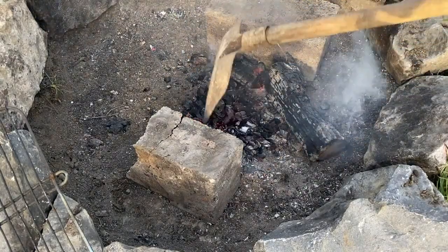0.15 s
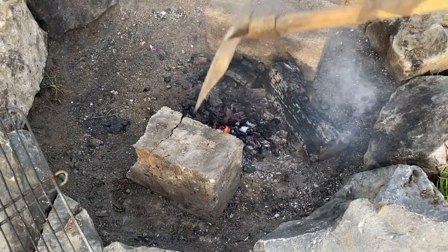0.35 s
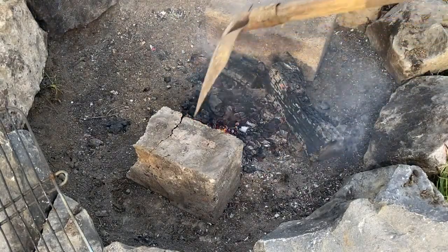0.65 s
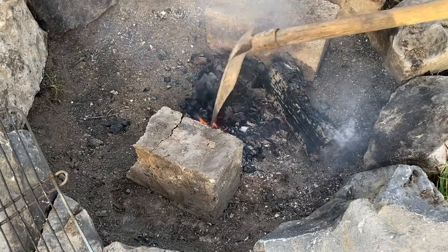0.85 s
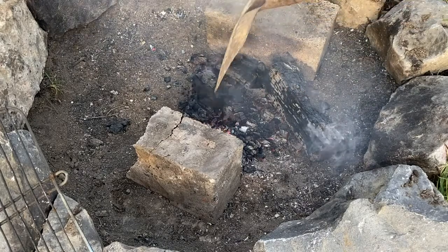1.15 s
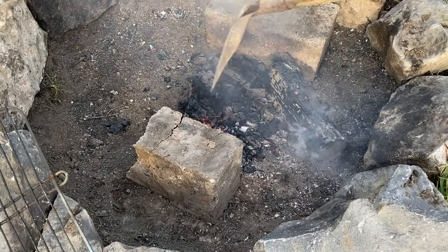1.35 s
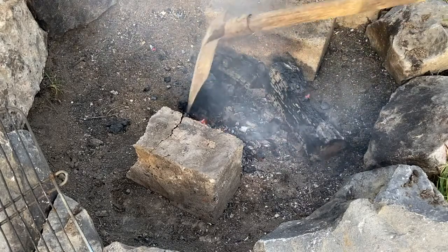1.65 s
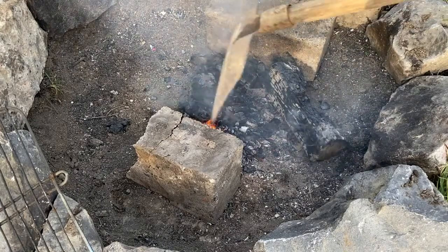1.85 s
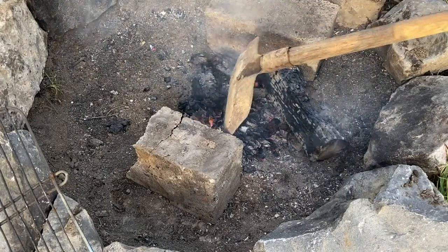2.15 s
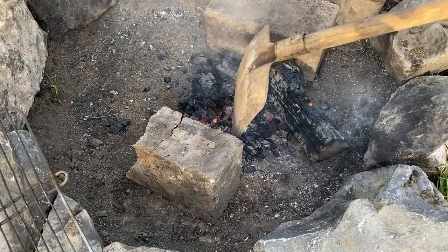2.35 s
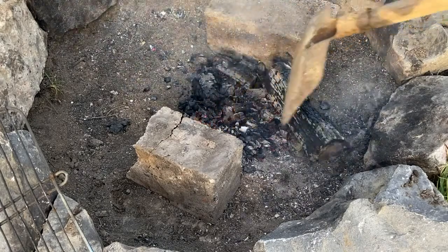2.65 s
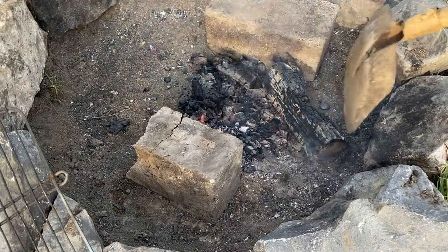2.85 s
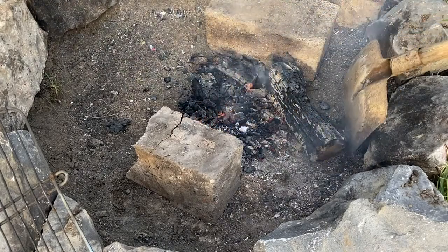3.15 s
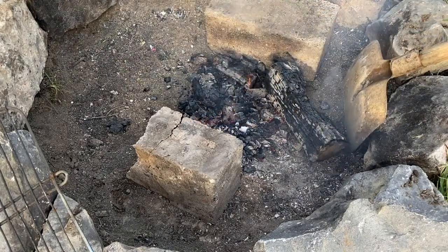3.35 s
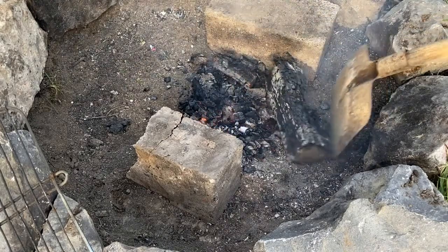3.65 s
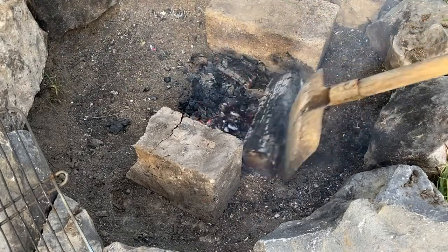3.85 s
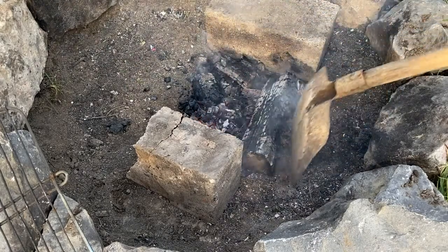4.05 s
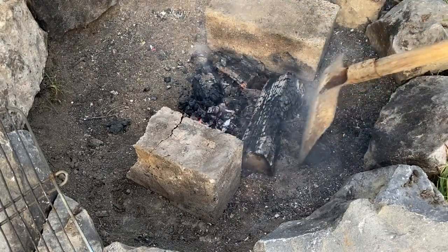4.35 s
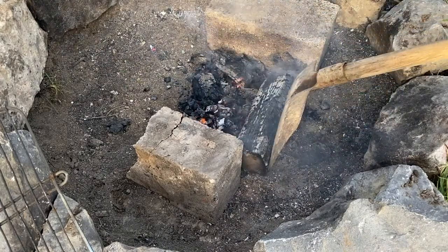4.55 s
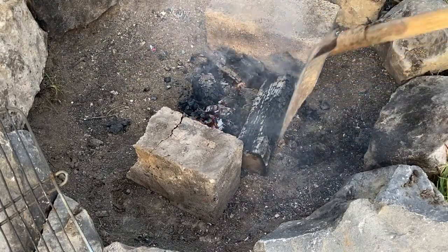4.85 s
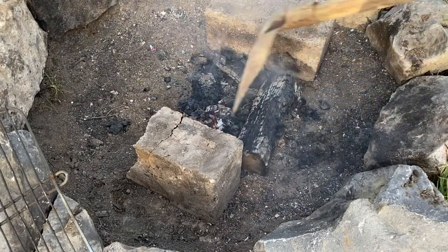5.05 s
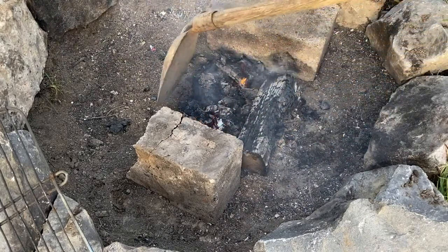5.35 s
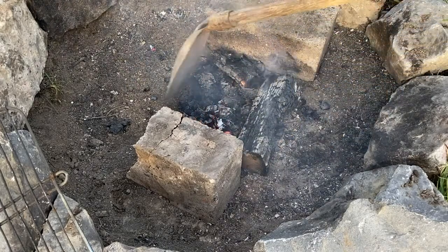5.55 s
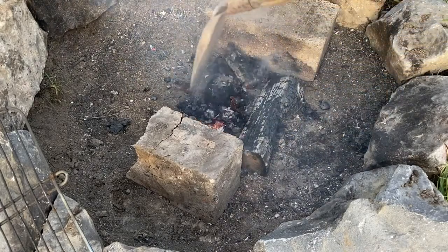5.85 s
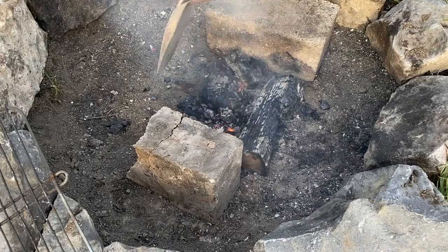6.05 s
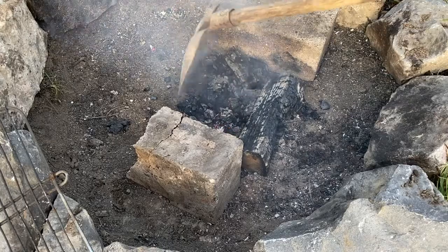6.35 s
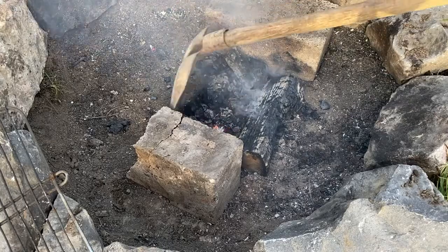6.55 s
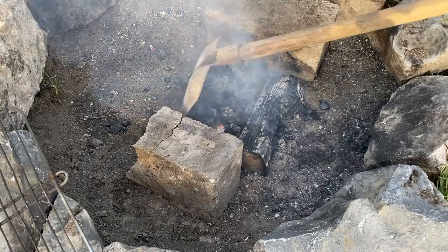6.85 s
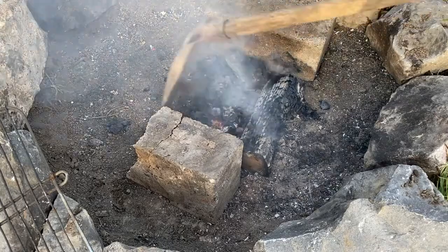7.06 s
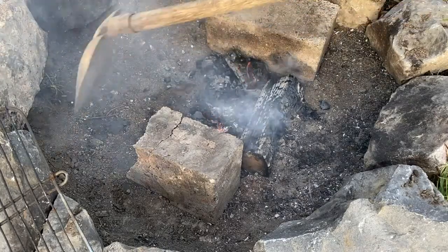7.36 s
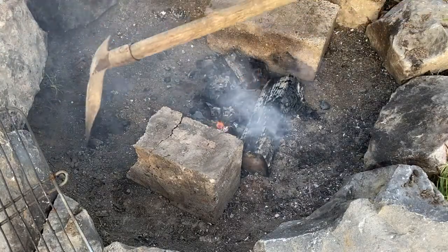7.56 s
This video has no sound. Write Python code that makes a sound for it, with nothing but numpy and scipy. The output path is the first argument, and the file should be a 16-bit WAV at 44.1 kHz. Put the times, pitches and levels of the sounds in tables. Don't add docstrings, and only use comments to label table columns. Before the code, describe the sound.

Outdoors, close phone pickup of a steel shovel in a stone fire pit. A soft thud and crunch open at 0 s, a sharp jab with brittle charcoal crunch lands at 0.34, a small metallic knock at 0.58, and a grating crunch at 0.78. After a lull of tiny ember ticks, jabs hit at 1.45-1.5 and a fuller thud with a crumbling scrape around 2.0, beside a sharp pop. It is mostly quiet until light grit at 3.1, then a log is nudged with crunches, clacks and thin ringing at 3.7, 4.2 and 4.4. Another hush of ticks precedes busy scraping at 5.35-5.7 with a thud and short metal squeal. The strongest blows come at 6.15, clanging and ringing, and 6.53, a heavy short thud, followed by coarse drags to 7.0. A final scrape and clink falls near 7.65. Low airy hum and a faint, intermittent far motor continue underneath.

```python
import sys
import numpy as np
from scipy import signal
from scipy.io import wavfile
from scipy.ndimage import uniform_filter1d

SR = 44100
rng = np.random.default_rng(int(sys.argv[2]) if len(sys.argv) > 2 else 0)


def voltage_ratio(level):
    return 10 ** (np.asarray(level, float) / 20)


def unload_audio(sound):
    columns = np.transpose(np.atleast_2d(sound))
    steps = np.round(np.clip(columns, -1, 1) * 32767)
    wavfile.write(sys.argv[1], SR, steps.astype(np.int16))


N = 340452


def evened(x):
    return x / np.sqrt(np.mean(x ** 2) + 1e-20)


def read(points, hz):
    f, value = np.transpose(points)
    return np.interp(np.log(hz + 1), np.log(f + 1), value)


def add(mix, start_s, sound):
    part = mix[max(round(start_s * SR), 0):][:len(sound)]
    part += sound[:len(part)]


def decay(t, t60_s, rise_s):
    rise = (1 - np.exp(-t / max(rise_s, 1e-4))) ** 2
    shape = rise * voltage_ratio(-60 * t / max(t60_s, .004))
    return shape / shape.max()


def coloured(x, spectrum, patchy_db, size, frames, bins):
    hz, _, z = signal.stft(x, SR, nperseg=size, noverlap=size * 3 // 4)
    patches = rng.standard_normal(z.shape)
    patches = uniform_filter1d(patches, size=frames, axis=1)
    patches = evened(uniform_filter1d(patches, size=bins, axis=0))
    z = z * voltage_ratio(read(spectrum, hz)[:, None] + patchy_db * patches)
    _, y = signal.istft(z, SR, nperseg=size, noverlap=size * 3 // 4)
    return evened(y[:N])


def blows(table, spread, rise_s, side_gain):
    out, t = np.zeros(N), np.arange(SR * 2 // 5) / SR
    chance = rng.random((len(table), 2, 4))
    for (start_s, db, hz, t60_s), (detune, phase) in zip(table, chance):
        side_hz = hz * np.exp(spread * (2 * detune - 1))
        side = np.sin(2 * np.pi * (np.outer(t, side_hz) + phase)).sum(axis=1)
        tone = np.sin(2 * np.pi * hz * t) + side_gain * side
        add(out, start_s - .001, voltage_ratio(db) * tone * decay(t, t60_s, rise_s))
    return out


def air():
    # frequency in Hz, level in dB per Hz.
    air_spectrum = [(12, -54), (20, -44), (53, -12.5), (124, -2.5), (217, -8), (250, -7), (288, -14.5),
                    (414, -11.5), (463, -14.5), (548, -17.5), (6130, -32.5), (15000, -33.5), (16400, -31)]
    # time in seconds, level in dB.
    drone_level = [
        (0, -53),
        (.5, -105),
        (3.6, -67),
        (4.2, -64),
        (5.4, -74),
        (5.9, -112),
        (7.72, -58),
    ]
    drone_hz = 70
    noise = rng.standard_normal(N)
    hum = voltage_ratio(-62) * coloured(noise, air_spectrum, patchy_db=1.8, size=2048, frames=8, bins=10)
    t = np.arange(N) / SR
    waver = evened(uniform_filter1d(rng.standard_normal(N), size=3000))
    tone = np.sin(2 * np.pi * np.cumsum(drone_hz * (1 + 0.125 * waver)) / SR)
    return hum + voltage_ratio(np.interp(t, *np.transpose(drone_level))) * tone


def fire():
    # start in seconds, peak in dB, frequency in Hz, T60 in seconds.
    ember_pops = [(0.0868, -39, 8400, 0.035), (0.8998, -43, 3620, 0.017), (1.2085, -40, 10600, 0.02),
                  (1.6198, -41, 6450, 0.0096), (1.664, -47, 8610, 0.019), (1.703, -41.5, 11000, 0.016),
                  (1.825, -52.5, 4970, 0.027), (1.8864, -52.5, 9070, 0.032), (2.072, -33, 5770, 0.02),
                  (2.169, -49.5, 6740, 0.014), (2.587, -39, 9490, 0.02), (2.6693, -47.5, 10600, 0.019),
                  (2.763, -52, 8500, 0.025), (3.205, -49, 9000, 0.033), (3.3988, -48, 10500, 0.01),
                  (5.032, -50, 9794, 0.023), (5.2426, -46, 9300, 0.012), (5.846, -45, 9000, 0.035),
                  (5.9469, -51, 9930, 0.015), (7.009, -43.5, 7760, 0.017), (7.385, -43, 4450, 0.0067)]
    # start in seconds, peak in dB, frequency in Hz, T60
    # in seconds.
    faint_ticks = [
        (1.0217, -58, 4230, 0.012),
        (1.0621, -56, 11400, 0.012),
        (1.1299, -58, 12100, 0.012),
                   (4.7745, -59, 10900, 0.012),
        (4.8194, -60, 12200, 0.012),
        (4.8743, -52, 9810, 0.012),
        (4.8928, -57, 12000, 0.012),
        (4.9382, -58, 7020, 0.012),
                   (7.052, -58, 9000, .012),
        (7.0717, -55, 12000, .012),
    ]
    rise_s = .00015
    out, t = np.zeros(N), np.arange(2000) / SR
    pops = ember_pops + faint_ticks
    noise = rng.standard_normal((len(pops), len(t)))
    for (start_s, db, hz, t60_s), puff in zip(pops, noise):
        band = signal.butter(1, [hz * 0.5, min(hz * 1.78, 18000)], "bandpass", fs=SR)
        shape = decay(t, t60_s / 5, rise_s) + 1.05 * decay(t, t60_s, rise_s)
        add(out, start_s, voltage_ratio(db - 10.0) * evened(signal.lfilter(*band, puff)) * shape)
    return out


def pit(x):
    taps = np.zeros(SR // 4)
    slots = np.arange(120, len(taps) - 22, 22)
    at = slots + rng.integers(0, 22, len(slots))
    taps[at] = rng.choice([-1., 1.], len(at)) * voltage_ratio(-60 * at / SR / 0.093)
    taps = signal.lfilter(*signal.butter(1, 6000, fs=SR), taps)
    return signal.fftconvolve(x, taps / np.linalg.norm(taps))[:N]


def jolts():
    # start in seconds, peak in dB, frequency in Hz, T60 in seconds.
    low_blows = [(0.0, -49, 85.3, 0.26), (0.34, -48, 96, .2), (0.78, -58, 102, .2), (3.4, -62.5, 85, .5),
                 (5.46, -58, 50.4, 0.23), (6.15, -62, 60, .3), (6.75, -65, 90, .2),
                 (7.66, -58.5, 70, 0.22), (3.735, -46, 190, .1), (6.155, -37, 190, .08),
                 (6.527, -37, 195, .12), (6.63, -51, 200, .15)]
    return blows(low_blows, spread=0.3, rise_s=0.0059, side_gain=0.37)


def thuds():
    # start in seconds, peak in dB, frequency in Hz, T60 in seconds, hollow note in dB.
    dull_blows = [(0.002, -52.5, 240, 0.063, -55), (0.087, -37.5, 277, 0.045, -43),
                  (0.273, -44, 271, 0.18, -60), (0.337, -26, 258.6, 0.063, -46),
                  (0.375, -42, 260, 0.18, -63), (0.582, -32.5, 272, 0.031, -39),
                  (0.774, -42.5, 273.6, 0.2, -46), (1.449, -30.5, 274, 0.041, -62),
                  (1.512, -35.5, 282, 0.046, -38.5), (1.538, -39.5, 280, 0.072, -63),
                  (1.981, -27.5, 254, 0.1, -44), (2.505, -56, 245, 0.14, -64),
                  (3.735, -42.5, 253, 0.12, -68), (4.407, -44, 300, 0.23, -45),
                  (5.366, -45, 380, 0.02, -47), (5.49, -41.5, 263, 0.067, -44.5),
                  (5.567, -26, 320, 0.031, -35.5), (5.6, -43.5, 330.5, 0.17, -53),
                  (5.625, -39, 250, 0.06, -55), (5.741, -46.5, 273, 0.087, -78),
                  (6.153, -22.5, 265, 0.12, -36), (6.527, -18.5, 266, 0.024, -28.5),
                  (6.818, -50, 240, 0.11, -54), (6.897, -48, 252, 0.17, -66)]
    # start in seconds, peak in dB, T60 in seconds.
    stamps = [
        (0.002, -46.5, 0.13),
        (.337, -38, 0.12),
        (0.776, -57, 0.2),
        (1.512, -53.5, .11),
    ]
    boom_db = -27.5
    body = blows([row[:4] for row in dull_blows], 0.33, 0.0021, 0.4) * voltage_ratio(-2.5)
    ground = [(s, db + boom_db, 1.7 * t60_s) for s, db, _, t60_s, _ in dull_blows] + stamps
    boom = blows([(s, db, 118, t60_s) for s, db, t60_s in ground], 0.334, 0.0041, 0.78)
    upper = [(s, db - 7.5, 530, 0.83 * t60_s) for s, _, _, t60_s, db in dull_blows]
    hollow = blows(upper, 0.15, 0.0011, 0.95)
    return body + boom + hollow


def knocks():
    # start in seconds, peak in dB, frequency in Hz, T60 in seconds.
    hard_knocks = [(0.084, -37.5, 1360, 0.0061), (0.272, -44, 950, 0.018), (0.379, -49, 965, 0.031),
                   (0.423, -52.5, 920, 0.022), (0.578, -39.5, 1080, 0.012), (0.776, -33, 1460, 0.0097),
                   (0.899, -50, 1750, 0.012), (1.51, -37, 1304, 0.018), (1.981, -34.5, 950, 0.1),
                   (5.742, -59, 1310, 0.015), (6.156, -26, 1306, 0.03), (6.164, -28, 1008, 0.012),
                   (6.526, -40.5, 1968, 0.05), (7.473, -33.5, 1140, 0.0042)]
    return blows(hard_knocks, spread=0.453, rise_s=0.0023, side_gain=0.45)


def clacks():
    # start in seconds, peak in dB, frequency in Hz, T60 in seconds.
    char_clacks = [(0.268, -58, 3530, .03), (0.338, -41, 2980, 0.043), (0.338, -38, 3580, .025),
                   (0.372, -47, 1370, 0.027), (0.423, -56, 1350, .015), (1.51, -44, 1570, 0.016),
                   (1.985, -39, 1390, .04), (2.03, -43.5, 3140, 0.033), (2.5, -59, 1300, 0.018),
                   (2.502, -63, 7000, 0.079), (3.7, -46, 2570, .03), (3.737, -43, 2250, 0.032),
                   (3.738, -51, 6000, .025), (3.955, -64, 3500, .02), (4.378, -47, 1490, .03),
                   (4.41, -40, 1330, 0.024), (4.497, -57, 4000, .008), (4.525, -65, 3130, 0.025),
                   (5.553, -46, 5530, .03), (6.157, -31, 490, 0.06), (6.527, -40, 2980, .03),
                   (7.052, -70, 4500, .01), (7.072, -74, 4880, .01)]
    return blows(char_clacks, spread=0.076, rise_s=0.00098, side_gain=0.64)


def grains(per_s, spread_db):
    size = voltage_ratio(spread_db * np.minimum(rng.exponential(1, N), 3))
    return size * rng.standard_normal(N) * (rng.random(N) < per_s / SR)


def stroke(at_s, rise_s, fall_s, db):
    rest_db, rise_bend, fall_bend = -73.5, 1.97, 1.21
    t = np.arange(-rise_s, fall_s, 1 / SR)
    away = np.where(t < 0, abs(t / rise_s) ** rise_bend, abs(t / fall_s) ** fall_bend)
    return at_s - rise_s, db + (rest_db - db) * away


def grit():
    # start in seconds, peak in dB, T60 in seconds, coarse part in dB re fine.
    crunches = [(0.0024, -30, 0.065, -0.5), (0.0296, -42.5, 0.24, 3), (0.2648, -37.5, 0.059, -4.5),
                (0.3411, -18.5, 0.036, -4.5), (0.412, -46, 0.087, -3), (0.7656, -28.5, 0.048, 3),
                (0.7725, -23.5, 0.13, -6), (0.801, -29.5, 0.11, -11), (1.4478, -21, 0.066, -5.5),
                (1.958, -24, 0.25, -7.5), (1.98, -20.5, 0.03, 2), (2.0294, -26, 0.066, -1.5),
                (2.124, -49.5, 0.11, 0.5), (3.0774, -35.5, 0.11, -4.5), (3.114, -35, 0.04, -1),
                (3.691, -35, 0.39, 2), (3.709, -26.5, 0.049, -7), (3.7359, -27.5, 0.061, 0),
                (4.1884, -27, 0.051, -24), (4.373, -38.5, 0.43, 3), (4.4079, -27.5, 0.12, 3),
                (5.3502, -36, 0.1, -22), (5.4484, -48, 0.12, -11), (5.549, -33, 0.14, -1),
                (6.222, -39.5, 0.043, -6), (7.439, -41.5, 0.087, 2), (7.46, -40, 0.087, 2.5),
                (7.638, -33, 0.11, -4.5)]
    cracks = [(0.337, -19.5, 0.02, -7), (0.37, -37, 0.12, 0), (0.5778, -31, 0.042, 0.5),
              (2.053, -30, 0.11, -26), (3.8023, -41.5, 0.44, 2.5), (3.839, -42, 0.1, 8),
              (4.178, -42.5, 0.12, 5), (4.303, -49, 0.048, -13), (5.3622, -38, 0.07, -28),
              (5.486, -33.5, 0.19, 1.5), (6.1555, -21.5, 0.064, 7.5), (6.5271, -32, 0.034, 13.5),
              (7.566, -48, 0.1, 5), (7.576, -42, 0.14, 0.5), (7.6628, -28, 0.094, 0)]
    # hardest pressure in seconds,
    # rise in seconds, fall in seconds, level in dB, coarse part in dB re fine.
    drags = [(.44, 0.092, 0.098, -66, 5.5), (.79, .005, 0.16, -56.5, 6), (1.47, .005, 0.17, -55, 4.5),
             (2.06, 0.11, 0.068, -44.5, -3), (2.514, 0.066, 0.013, -69, 6), (3.084, 0.058, 0.099, -63, 4.5),
             (3.53, 0.027, 0.52, -60, -6), (3.66, 0.18, .04, -61, 3), (3.85, 0.16, 0.06, -54.5, 1.5),
             (3.97, 0.11, 0.082, -68, -3), (4.31, 0.017, 0.15, -64.5, 10.5), (4.43, .01, 0.22, -56, -9),
             (5.361, 0.024, 0.029, -47, -1), (5.48, 0.067, .04, -55.5, 0.5),
             (5.564, 0.063, 0.048, -41.5, 3), (5.631, 0.086, 0.079, -40, 1), (5.7, 0.016, 0.27, -59, -8.5),
             (6.229, 0.079, 0.071, -49, 11), (6.394, 0.067, 0.074, -51.5, 4), (6.471, 0.1, 0.057, -52, 3),
             (6.621, 0.072, 0.045, -39, -5.5), (6.809, 0.12, 0.2, -47, 1.5), (7.6, 0.084, .1, -66, 9),
             (7.679, 0.0068, 0.024, -55, 2)]
    # frequency in Hz, level in dB per Hz.
    coarse_spectrum = [(100, -19), (230, 6.5), (480, -7.5), (750, -14), (2000, -4), (3000, -10), (4500, -9),
                       (9000, -29)]
    fine_spectrum = [(900, -58), (1800, -38), (2600, -6.5), (3500, -4.5), (5500, -1.5), (7500, 0),
                     (9500, -5), (14000, -36)]
    dust_spectrum = [(3000, -62), (6500, -29), (8500, -6), (11000, -2), (13500, -6), (15500, -10.5),
                     (16400, -13)]
    crunch_dust_db, crack_dust_db, drag_dust_db = -1, -8, 0.5
    dust_db_per_coarse_db = -0.16

    power, t = np.zeros((3, N)), np.arange(SR // 2) / SR
    breaks = [(*row, crunch_dust_db) for row in crunches] + [(*row, crack_dust_db) for row in cracks]
    for start_s, db, t60_s, coarse_db, dust_db in breaks:
        burst = (voltage_ratio(db - 12.0) * decay(t, t60_s, 0.0016)) ** 2
        for stream, rel_db in zip(power, (coarse_db, 0, dust_db)):
            add(stream, start_s - .001, burst * voltage_ratio(rel_db) ** 2)
    for at_s, rise_s, fall_s, db, coarse_db in drags:
        start_s, level_db = stroke(at_s, rise_s, fall_s, db)
        dust_db = drag_dust_db + dust_db_per_coarse_db * coarse_db
        for stream, rel_db in zip(power, (coarse_db, 0, dust_db)):
            add(stream, start_s, voltage_ratio(level_db + rel_db - 5.5) ** 2)

    slips = voltage_ratio(1.7 * evened(uniform_filter1d(rng.standard_normal(N), size=260)))
    chips = grains(16000, 2.1)
    coarse = coloured(grains(6000, 1.56), coarse_spectrum, 3.2, size=256, frames=8, bins=2)
    fine = coloured(chips, fine_spectrum, 3.7, size=256, frames=10, bins=2)
    dust = coloured(chips, dust_spectrum, 4.7, size=256, frames=10, bins=3)
    return evened(slips) * (np.sqrt(power) * [coarse, fine, dust]).sum(axis=0)


def favoured_modes():
    # start in seconds, peak in dB,
    # frequency in Hz, T60 in seconds.
    plate_notes = [(0.087, -57, 404, 1.2), (0.338, -56, 2540, .2), (0.579, -54, 1389, .45),
                   (0.579, -47, 3063, .17), (0.579, -48, 2998, 0.34), (0.579, -58, 2013, .4),
                   (0.579, -57, 3208, 0.28), (0.579, -60, 4043, 0.2), (0.775, -50, 2740, 0.22),
                   (0.79, -43, 3560, 0.11), (0.79, -47, 4810, .15), (1.45, -51, 935, .2),
                   (1.47, -66, 2441, 0.91), (1.54, -63, 4490, 0.28), (1.53, -61, 2013, .25),
                   (2.03, -50, 3000, 0.26), (2.04, -55, 1700, 0.32), (2.0, -42.5, 1300, 0.19),
                   (3.59, -68, 5180, .15), (3.615, -62, 1560, .1), (3.71, -45, 1480, .12),
                   (3.737, -48, 404, 0.19), (3.842, -52, 2441, 0.33), (3.845, -55, 2998, 0.19),
                   (4.19, -45, 6089, 0.14), (4.19, -48, 4177, 0.14), (4.19, -50, 4877, 0.19),
                   (4.19, -62, 2998, 0.29), (4.41, -62, 1700, .25), (4.415, -45, 2441, 0.35),
                   (4.19, -60, 2439, 1.2), (4.19, -62, 1389, .4), (4.3, -62, 1400, .3),
                   (4.47, -62, 2998, .3), (5.362, -59, 2441, .5), (5.42, -67, 2735, .5),
                   (5.66, -57, 404, .5), (5.362, -47.5, 4490, 0.15), (5.49, -52, 2153, .2),
                   (5.49, -50, 5399, .1),
                   (6.16, -44, 1421, .6), (6.222, -38, 404, .85), (6.16, -44, 2444, 0.4), (6.2, -49, 2902, 0.46),
              (6.16, -50, 2261, .3), (6.2, -53, 4334, .3), (6.2, -56, 3225, .3), (6.2, -56, 4974, .2),
              (6.22, -58, 5168, 0.16), (6.2, -63, 3461, .3), (6.2, -62, 5636, .16), (6.16, -54, 1707, .6),
              (6.23, -56, 1421, .7), (6.23, -53, 2430, 0.45), (6.23, -58, 2008, 0.58),
              (6.37, -65, 2930, .3), (6.53, -50, 2998, .2), (6.53, -49, 2013, 0.27),
              (6.53, -49, 1389, 0.34), (6.53, -55, 2444, .3), (6.53, -48, 3219, .14), (6.53, -52, 5130, .2),
              (6.53, -50, 1696, .15), (7.672, -44, 1405, 0.16), (7.668, -49, 4813, .2),
              (7.666, -49, 4468, .13), (7.666, -48, 3268, .09), (7.67, -50, 2902, .12),
              (7.676, -42, 2050, .07), (7.666, -43, 3558, 0.091), (7.666, -49, 5206, .1)]
    return blows(plate_notes, spread=0.006, rise_s=0.0014, side_gain=0.21)


def struck(table, families, buried_t60_s):
    hz, db, t60_s = np.concatenate(families).T
    family = np.repeat(np.arange(len(families)), [len(f) for f in families])
    t = np.arange(SR // 2) / SR
    flutter = rng.standard_normal((len(t), len(hz)))
    flutter = evened(uniform_filter1d(flutter, size=600, axis=0))
    flutter_depth = .4 * np.clip(hz / 1500 - .2, 0, 1)
    ring = voltage_ratio(db - 60 * t[:, None] / t60_s) * np.exp(2j * np.pi * hz * t[:, None])
    out, chance = np.zeros(N), rng.standard_normal((len(table), 2, len(hz)))
    for k, ((start_s, *levels_db, free_s), (place, phase)) in enumerate(zip(table, chance)):
        mode_db = np.array(levels_db)[family] + 2.0 * place
        touch = 1 + flutter_depth * np.roll(flutter, k, axis=1)
        tone = ((ring * touch) @ (voltage_ratio(mode_db) * np.exp(3j * phase))).real
        buried_db = -60 * np.maximum(t - free_s, 0) / buried_t60_s
        add(out, start_s, tone * voltage_ratio(buried_db) * (1 - np.exp(-t / 0.0011)))
    return out


def rubbed():
    # start in seconds, length in seconds, frequency in Hz, level in dB.
    rubs = [
        (0.59, 0.012, 3200, -53),
        (3.066, 0.044, 1406, -64),
        (3.508, 0.17, 1425, -60),
        (3.799, 0.053, 2441, -55.5),
        (5.621, 0.035, 400, -55),
        (5.36, 0.028, 4490, -65),
        (5.6, 0.043, 1413, -51.5),
        (5.598, 0.053, 4490, -58),
        (5.607, 0.03, 3546, -52),
        (6.742, 0.16, 2455, -66),
    ]
    out = np.zeros(N)
    noise = rng.standard_normal((len(rubs), SR // 2))
    t = np.arange(SR // 2) / SR
    for (start_s, length_s, hz, db), hiss in zip(rubs, noise):
        friction = hiss * np.sqrt(abs(np.sin(np.pi * np.minimum(t / length_s, 1))))
        mode = voltage_ratio(-60 * t / 0.2) * np.sin(2 * np.pi * hz * t)
        tone = signal.fftconvolve(friction, mode)[:len(t)]
        add(out, start_s, voltage_ratio(db + 7) * tone / abs(tone).max())
    return out


def blade(scrape):
    # frequency in Hz, level in dB, T60 in seconds.
    bend = [(404, 0, 0.8)]
    twist = [(1163, -4, .2), (1270, 0, .17), (1389, -5, .5), (1427, -5, .5)]
    scoop = [(931, -5, .2), (1707, -5, .35), (2013, 0, .4), (2261, -11, .5)]
    rim = [(2153, -1, .15), (2441, -2, .55)]
    belly = [(2740, -2, .2), (2902, -3, .3), (2998, -3, .26), (3063, -1, .17), (3212, -5, .26),
             (3391, -5, .19), (3564, -3, .17)]
    edge = [(3779, -8, .2), (4043, -2, .13), (4177, -3, .13), (4334, -4, .15), (4490, -7, .18),
            (4974, -3, .15), (5168, -6, .17), (5399, -10, .2), (5642, -11, .2), (6089, -1, .1),
            (6928, -4, .12), (7171, -3, .12)]
    # start in seconds, bend, twist and scoop in dB, seconds until buried.
    rings = [(0.0, -62, -49.5, -74, 0.15), (0.578, -57, -54, -53, 0.15), (0.775, -68, -57.5, -77, .15),
             (1.511, -51, -60, -69, .2), (1.982, -41.5, -67, -46, 0.028), (4.189, -59, -62, -63, 0.13),
             (4.378, -66, -61, -70, 0.055), (4.41, -57, -61, -72, 0.092), (5.362, -50, -69, -79, 0.03),
             (5.491, -46, -68, -72, 0.03), (5.567, -39, -64, -56, 0.035), (6.158, -46, -39, -53, 0.36),
             (6.527, -29.5, -50.5, -50, 0.095), (7.666, -62, -54, -54, .1)]
    # start in seconds, rim, belly and edge in dB,
    # seconds until buried.
    glances = [(0.578, -62, -59, -54, 0.17), (0.775, -71, -53, -46, 0.067), (1.511, -69, -67, -62.5, .12),
               (4.189, -54, -63, -50, 0.14), (4.378, -47, -68, -62, 0.1), (4.41, -49, -57, -50, 0.038),
               (5.36, -63, -70, -55, .05), (6.158, -69, -46.5, -49, 0.27), (6.224, -51, -53, -47, .14),
               (6.528, -54, -48, -53, 0.072), (7.666, -55, -56, -56, 0.045)]
    buried_t60_s, grazed_t60_s = .045, .2
    dragged_t60_s = .2

    hz, db, t60_s = np.concatenate([bend, twist, scoop, rim, belly, edge]).T
    t = np.arange(SR // 4)[:, None] / SR
    fall_db = db - 60 * t / t60_s - 60 * t / dragged_t60_s
    damped = (voltage_ratio(fall_db) * np.sin(2 * np.pi * hz * t)).sum(axis=1)
    hum = voltage_ratio(-16.0) * signal.fftconvolve(scrape, damped / np.linalg.norm(damped))[:N]
    deep = struck(rings, [bend, twist, scoop], buried_t60_s)
    bright = struck(glances, [rim, belly, edge], grazed_t60_s)
    return deep + bright + rubbed() + hum


def scene():
    scrape = grit()
    near = scrape + blade(scrape) + thuds() + knocks() + fire()
    near = signal.sosfilt(signal.butter(4, 90, "highpass", fs=SR, output="sos"), near)
    mix = near + voltage_ratio(-11.5) * pit(near) + air()
    return (mix + favoured_modes() + clacks() + jolts())[None]


def low_pass(x):
    return signal.sosfilt(signal.butter(12, 16510, fs=SR, output="sos"), x)


def record(dry):
    band = signal.oaconvolve(dry, signal.firwin(255, 15750, fs=SR)[None], "same")
    leak = voltage_ratio(-15) * (dry - band)
    return low_pass(band + leak)


dry = scene()
out = record(dry)
unload_audio(out)
```